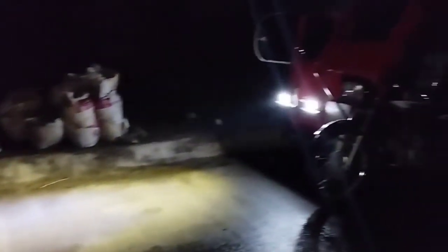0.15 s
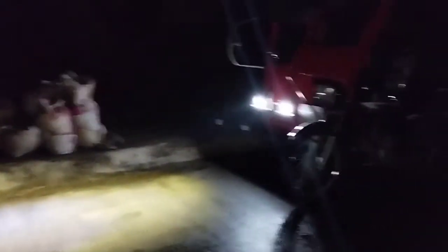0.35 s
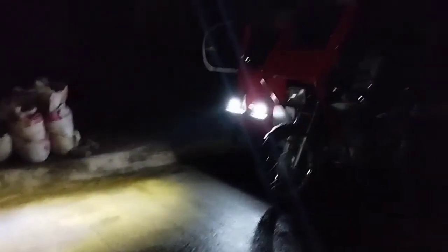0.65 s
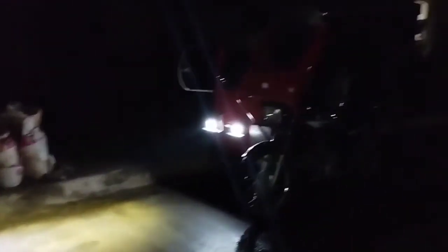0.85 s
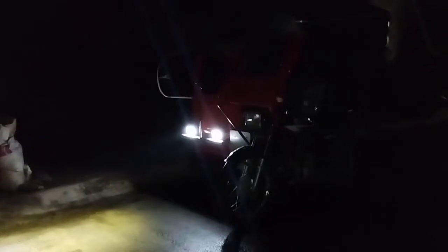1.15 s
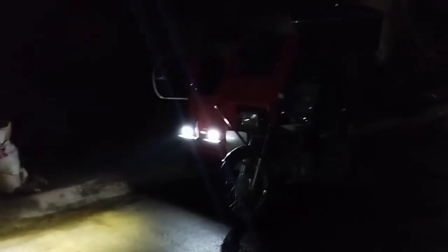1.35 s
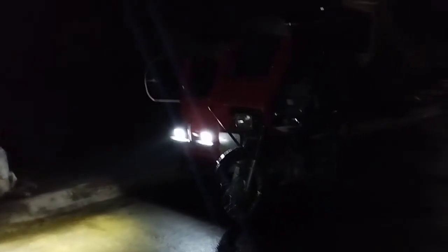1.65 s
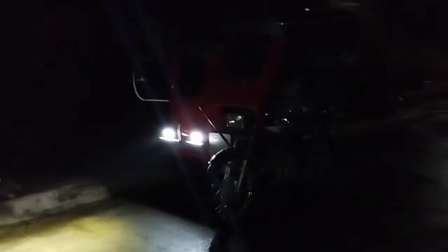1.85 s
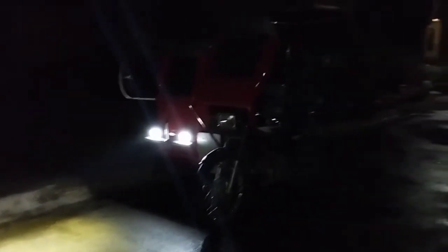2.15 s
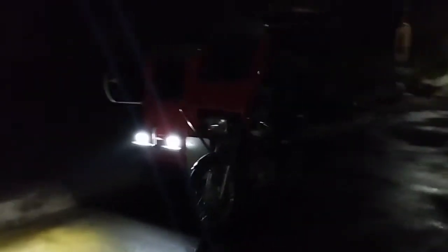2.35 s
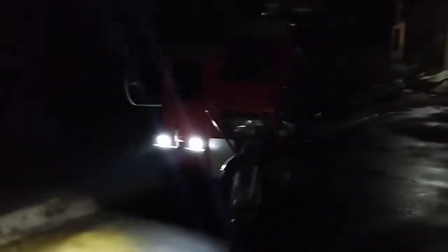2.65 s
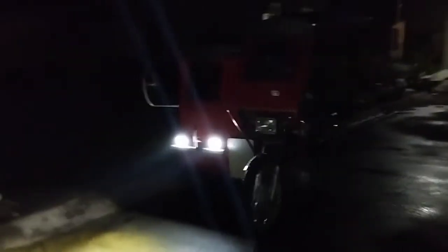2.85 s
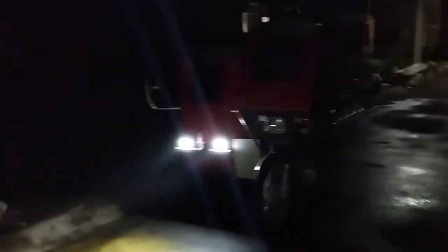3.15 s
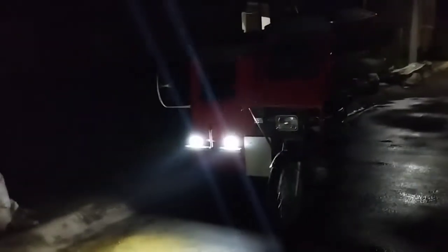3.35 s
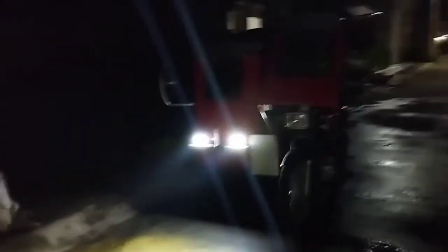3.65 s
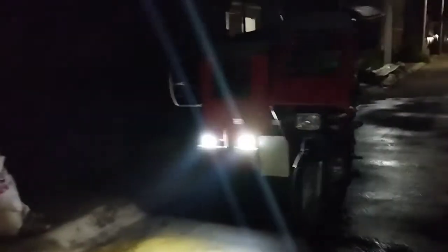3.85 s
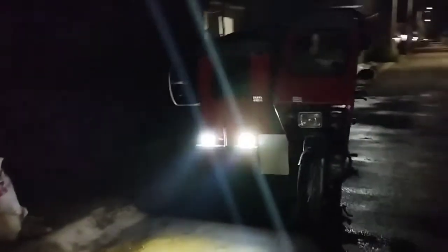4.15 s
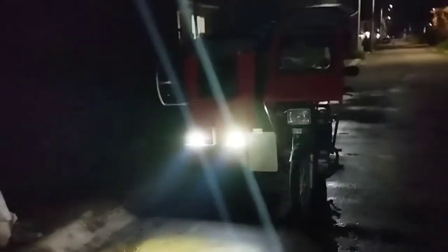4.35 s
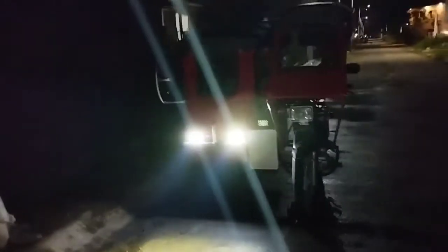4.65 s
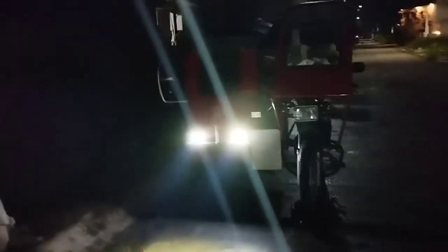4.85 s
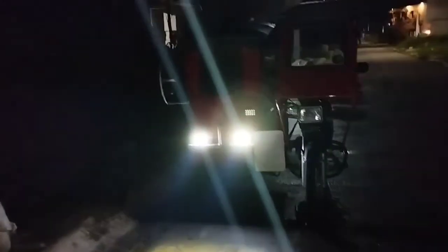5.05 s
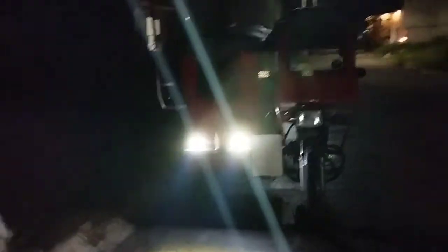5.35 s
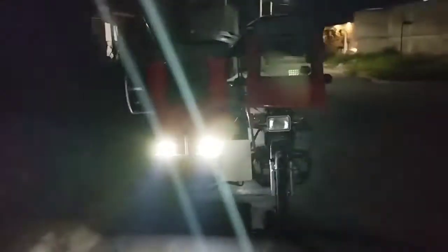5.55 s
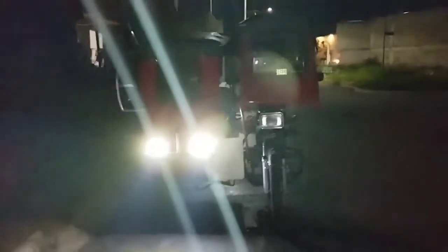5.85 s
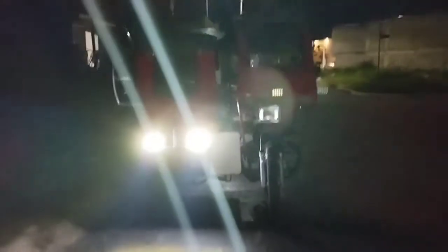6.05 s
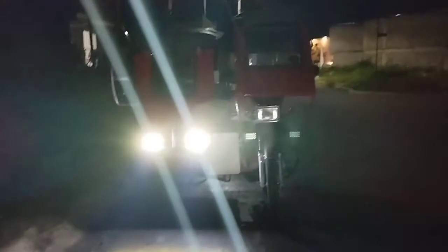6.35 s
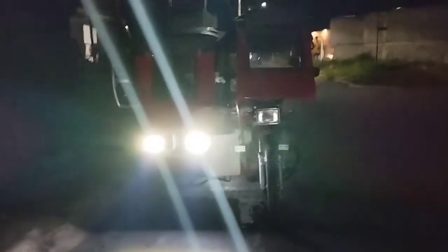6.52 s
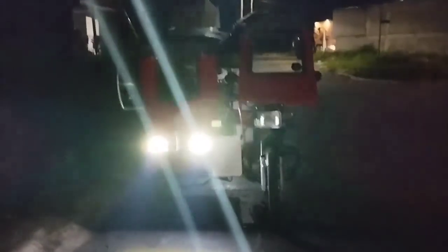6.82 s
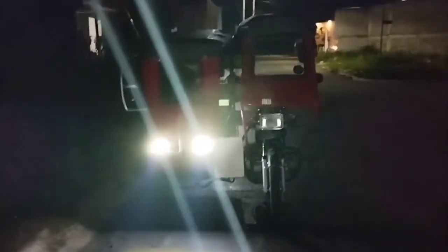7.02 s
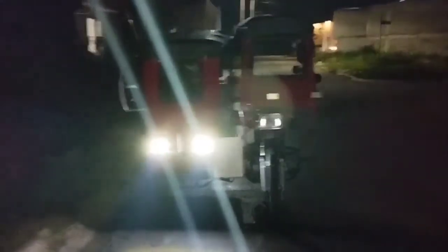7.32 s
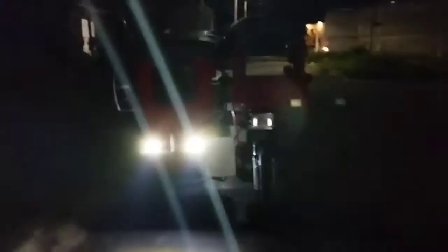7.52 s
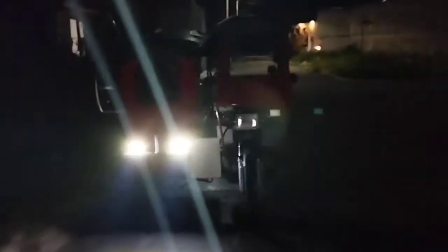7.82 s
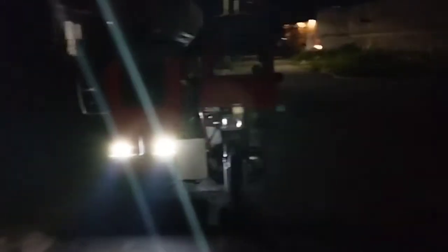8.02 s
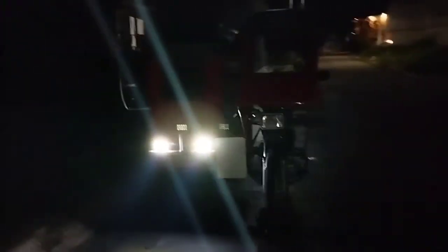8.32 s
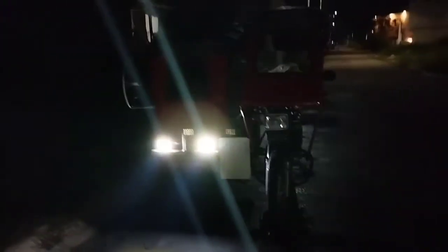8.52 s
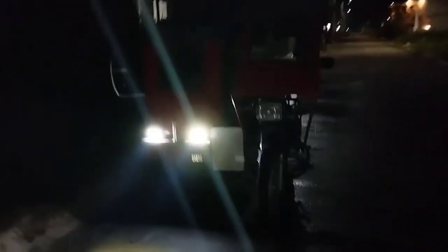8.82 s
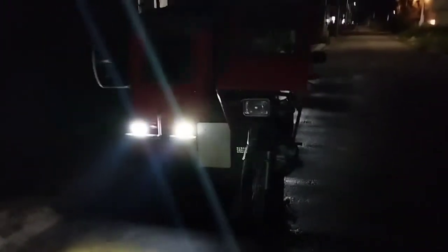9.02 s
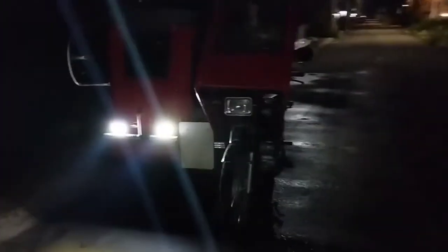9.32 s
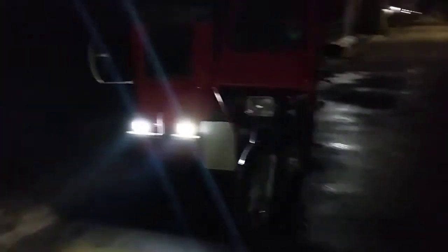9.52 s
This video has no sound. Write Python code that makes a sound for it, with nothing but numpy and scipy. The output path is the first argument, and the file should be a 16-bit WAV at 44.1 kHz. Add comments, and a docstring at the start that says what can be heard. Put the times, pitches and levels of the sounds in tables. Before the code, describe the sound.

A nearby tricycle engine putters steadily throughout, soft low thuds under rattling crankcase noise. Faint rubs, squeaks and hard little clicks occur close to the handheld microphone. Another small engine hums from afar, swelling and fading as its pitch climbs, then goes by a few metres away with hollow, pulsing exhaust blare. Low street rumble, slight reflections and a constant thin treble fizz surround it.

```python
"""A single-cylinder motor tricycle idles on a road at night: about nine firings a second ring its exhaust
and body, over shaped-noise clatter and valve ticks; a thin, pulsed noise sizzle sits high in the treble.
From far away a second engine drones up as four sine orders of its crank, gaining speed overall.
Filtered-noise scuffs, squeals and clicks sound close by.
The second engine then passes, its firing pulses ringing the silencer over bursts of exhaust gas."""
import sys
import numpy as np
from scipy import signal
from scipy.fft import rfft, irfft
from scipy.io import wavfile

SR = 44100
rng = np.random.default_rng(int(sys.argv[2]) if len(sys.argv) > 2 else 0)


def generate_wav(signal):
    """Clip the signal to [-1, 1] and save it as 16-bit WAV at the path in sys.argv[1]."""
    frames = np.transpose(np.atleast_2d(signal))
    scaled = np.clip(frames, -1, 1) * 32767
    pcm = np.round(scaled).astype(np.int16)
    wavfile.write(sys.argv[1], SR, pcm)


N = 426888
TIME = np.arange(N) / SR
FREQS = np.fft.rfftfreq(N, 1 / SR)
IDLE_HZ = 9.357  # mean firings per second


def amp(db):
    """Decibels to gain."""
    return 10 ** (np.asarray(db) / 20)


def evened(x):
    """Scales to rms 1."""
    return x / np.sqrt(np.mean(x ** 2) + 1e-20)


def read(points, hz):
    """A spectrum, joined by straight lines over log frequency."""
    f, value = np.transpose(points)
    return np.interp(np.log(hz + 1), np.log(f + 1), value)


def follow(rows):
    """A (time, value) curve at every sample."""
    s, value = np.transpose(rows)
    return np.interp(TIME, s, value)


def gain(rows):
    """A (time, dB) curve as gain at every sample."""
    return amp(follow(rows))


def colour(x, spectrum):
    """Filters by a spectrum, to rms 1."""
    return evened(irfft(rfft(x) * amp(read(spectrum, FREQS)), N))


def causal(x, spectrum):
    """Minimum-phase filter: each pulse starts sharply and rings afterwards, to rms 1."""
    cepstrum = irfft(np.log(amp(read(spectrum, FREQS))), N)
    cepstrum[1:] *= 2 * (np.arange(1, N) < N // 2)
    return evened(irfft(rfft(x) * np.exp(rfft(cepstrum)), N))


def place(x, balance):
    """Leans each frequency to the left or right by its L-R dB."""
    lean_db = read(balance, FREQS) / 2
    return irfft(rfft(x) * amp([lean_db, -lean_db]), N)


def air_noise():
    """White noise at two microphones, most alike in the bass."""
    # left-right likeness: pitch_hz, correlation
    likeness = [(60, 0.96), (130, 0.96), (290, 0.99), (640, 0.68), (1410, 0.27), (3100, -0.15),
                (6820, 0.074), (15000, -0.072)]
    a, b = rfft(rng.standard_normal((2, N)))
    same = np.clip(read(likeness, FREQS), -1, 1)
    mid = a * np.sqrt((1 + same) / 2)
    side = b * np.sqrt((1 - same) / 2)
    return irfft(np.array([mid + side, mid - side]), N)


def wander(hz):
    """Slow chance of rms 1, up to about hz."""
    return evened(irfft(rfft(rng.standard_normal(N)) * np.exp(-(FREQS / hz) ** 2), N))


def ring(x, modes):
    """Passes x through damped resonances (Hz, width Hz, dB), to rms 1."""
    response = 0
    for hz, width_hz, db in modes:
        damping = 1j * FREQS * width_hz
        response = response + amp(db) * damping / (hz ** 2 - FREQS ** 2 + damping)
    return evened(irfft(rfft(x) * response, N))


def street(x, wet_db, t60_s):
    """Direct sound plus scattered echoes from walls and road."""
    t = TIME[:SR // 2]
    tail = air_noise()[:, :len(t)] * amp(-60 * t / t60_s) * (t > .012)
    tail = tail / np.linalg.norm(tail[0])
    return x + amp(wet_db) * signal.fftconvolve(x[None], tail, axes=1)[:, :N]


def idle_turns():
    """Firings so far: a steady beat that hunts a little."""
    # firings come early or late: time_s, delay_s
    idle_lag = [(0, -.002), (.5, .002), (1.8, .002), (2.2, -.004), (2.9, .005), (3.4, .015), (3.9, .002),
                (4.3, -.002), (5.4, .005), (8.3, -.006), (9.68, 0)]
    first_firing_s = .080  # before hunting
    return IDLE_HZ * (TIME - first_firing_s - follow(idle_lag))


def idle_thumps(turns, uneven_db=1.3, puff_db=-56):
    """Each firing rings the exhaust, echoes off the sidecar and a wall, and trails a puff of gas."""
    # idling exhaust and sidecar body: pitch_hz, width_hz, relative_db
    thump_modes = [(44, 22, 1), (88, 26, 10.5), (143.5, 34, 6.5), (200, 36, 3), (324.3, 6, 5.5)]
    # thumps as the microphone moves: time_s, level_db
    thump_db = [(.8, -39.5), (2.2, -40.5), (3.3, -40.5), (4.3, -43.5), (5.5, -43), (9.68, -41.5)]
    at = np.flatnonzero(np.diff(np.floor(turns)))
    kicks = np.zeros(N)
    kicks[at] = amp(uneven_db * rng.standard_normal(len(at)))
    muffler = signal.butter(4, 235, fs=SR, output="sos")
    direct = signal.sosfilt(muffler, ring(kicks, thump_modes))
    blow = direct.copy()
    for delay_s, db in [(.0098, -4), (.033, -15)]:
        blow += amp(db) * np.interp(TIME - delay_s, TIME, direct)
    gas = air_noise() * np.exp(-(turns % 1) * np.pi)
    puff = signal.sosfilt(muffler, ring(gas, thump_modes))
    return gain(thump_db) * evened(blow) + amp(puff_db) * evened(puff)


def panel_hum(turns):
    """A loose body panel, one narrow mode kept ringing by noise that pulses with the firings."""
    # hum as the microphone moves: time_s, level_db
    panel_db = [(1.7, -56), (2.2, -66)]
    panel_mode = [(326, 6, 0)]
    return gain(panel_db) * ring(air_noise() * np.exp(-(turns % 1)), panel_mode)


def idle_knock(turns, decay_s=.013):
    """Each firing knocks in the crankcase: decaying noise through broad resonances."""
    # knock as the microphone moves: time_s, level_db
    knock_db = [(0, -74), (1.5, -66.5), (2.3, -58.5), (3.4, -58.5), (4.5, -63.5), (9.68, -65)]
    # what the knock rings: pitch_hz, width_hz, relative_db
    knock_modes = [(564, 120, -9.5), (730, 78, -6)]
    since_s = (turns - .04) % 1 / IDLE_HZ
    blow = air_noise() * np.exp(-since_s / decay_s)
    return gain(knock_db) * ring(ring(blow, knock_modes), [(704, 390, 0)])


def idle_clatter(turns, depth=0.94, tick_decay_cycles=0.01):
    """Piston and gears rattle the crankcase, least during the slow intake; the valves tick shut."""
    # clatter through one engine cycle, before depth: cycle_share after firing, relative_db
    clatter_cycle = [(.06, 2.5), (.25, -2), (.4, -.5), (.52, -3.5), (.63, -8), (.77, 2), (.86, -.5),
                     (.96, 1.5)]
    # clatter colour: pitch_hz, relative_db_per_hz
    clatter_colour = [(150, 13), (330, 5.5), (450, 4), (580, -13), (880, 8.5), (1050, 5), (1300, 2.5),
                      (1750, -5.5), (2600, -5.5), (4200, -7), (6200, -16), (7200, -28), (7900, -86),
                      (16000, -66)]
    # crankcase rings: pitch_hz, width_hz, relative_db
    case_modes = [(760, 27, -31), (974, 10, 5), (1021, 15, 11.5), (1110, 8.7, 12), (1260, 7.4, -25)]
    # clatter as the microphone moves: time_s, level_db
    clatter_db = [(.9, -47.5), (1.9, -50.5), (4.2, -52.5), (5, -51.5), (9.68, -48.5)]
    # rings against the clatter as the microphone moves: time_s, relative_db
    case_db = [(0, -11), (2.2, -13.5), (4.2, -11.5), (5.2, -8), (9.68, -11)]
    # valve ticks as the microphone moves: time_s, level_db
    tappet_db = [(0, -64), (.5, -60), (2, -61), (3.9, -56.5), (6.4, -58.5), (8.3, -56.5), (9.68, -57)]
    # stereo lean: pitch_hz, left_minus_right_db
    clatter_pan = [(300, 4.5), (480, -21), (660, 17), (900, -1.5), (1200, -4.5), (2000, -7.5), (4000, -4),
                   (7000, -2.5)]
    share, cycle_db = np.transpose(clatter_cycle)
    stroke_db = depth * np.interp(turns % 1, share, cycle_db, period=1)
    knocks = air_noise() * amp(stroke_db + .5 * wander(hz=255))
    rings = gain(case_db) * ring(knocks, case_modes)
    case = gain(clatter_db) * (colour(knocks, clatter_colour) + rings)
    seats = sum(np.exp(-((turns - seat) % 1) / tick_decay_cycles) for seat in (.09, .5, .82))
    ticks = air_noise() * (0.9 + seats * amp(5.8 * wander(hz=23)))
    tick_colour = [(900, -8.0), (2000, 4.0), (4300, -3.5), (6300, -10.5), (7300, -0.5), (8000, -64.0)]
    ticks = colour(ticks, tick_colour)
    return place(case + gain(tappet_db) * ticks, clatter_pan)


def rumble():
    """Noise for both engines scattered along the street, with a little air moving over each microphone."""
    # street rumble colour: pitch_hz, relative_db_per_hz
    rumble_colour = [(15, -21), (28, -7.5), (50, 4), (75, 1), (130, 3), (210, -9.5), (300, -14),
                     (500, -24.5), (1500, -105)]
    # street rumble, before wander: time_s, level_db
    rumble_db = [(0, -41.5), (2.8, -42.5), (3.8, -38.5), (5.2, -39.5), (7, -39), (9.68, -38)]
    # engine noise returned by the walls: pitch_hz, relative_db_per_hz
    far_hum = [(150, -2), (270, 13), (325, 4.5), (420, -1.5), (600, 0), (760, -0.5), (1100, -6),
               (1600, -11.5), (4000, -41), (8000, -83)]
    # wall return, swelling with the pass: time_s, level_db
    hum_db = [(0, -52), (2.5, -54.5), (5, -50), (5.9, -47.5), (6.7, -44), (8.2, -45.5), (9.68, -47.5)]
    wash = colour(air_noise(), rumble_colour) * amp(follow(rumble_db) + 1.0 * wander(hz=1.6))
    hum = colour(air_noise(), far_hum) * gain(hum_db)
    breeze_colour = [(12, 11), (28, 22), (60, 12), (150, -5), (600, -107)]
    breeze = colour(rng.standard_normal((2, N)), breeze_colour)
    return wash + hum + breeze * amp(-47.5 + 1.4 * wander(hz=2.4))


def sizzle(pulse_hz=233, buzz_db=-13, depth=0.13):
    """A thin electrical fizz: treble noise and sparks pulsing about pulse_hz times a second."""
    # fizz colour: pitch_hz, relative_db_per_hz
    sizzle_colour = [(8000, -77), (8800, -28), (9700, -15.5), (10500, -17.5), (11200, -21), (12000, -8),
                     (13200, 3), (14200, 5.5), (15500, 4)]
    # stereo lean: pitch_hz, left_minus_right_db
    sizzle_pan = [(9000, 9), (11200, 16), (12500, 5), (14000, 10.5), (15500, -9)]
    # lower skirt as the microphone turns: time_s, gain_db
    sizzle_tilt = [(0, 5.5), (1.8, 2.5), (3.2, 6.5), (4.6, 0.5), (9.68, -1)]
    start_db, growth_db_per_s = -47.5, 0.22
    turns = np.cumsum(pulse_hz * (1 + .002 * wander(hz=1.5))) / SR
    sparks = evened(np.sinc((turns % 1 - .5) * SR / pulse_hz))
    fizz = evened(air_noise() * (1 - depth * np.cos(2 * np.pi * turns)))
    # each burst partly repeats the one before
    fizz = evened(fizz + .25 * np.roll(fizz, round(SR / pulse_hz), axis=1))
    sound = place(colour(fizz + amp(buzz_db) * sparks, sizzle_colour), sizzle_pan)
    lower = irfft(rfft(sound) * read([(10800, 1), (12200, 0)], FREQS), N)
    tilted = sound + lower * (gain(sizzle_tilt) - 1)
    return tilted * amp(start_db + growth_db_per_s * TIME)


def squeals():
    """A light rub excites one narrow resonance, swelling and fading."""
    # faint rubbing squeals: start_s, length_s, pitch_hz, level_db at the crest, width_hz
    squeal_rows = [(0, 0.82, 2530, -59, 260), (2.15, 1.5, 1320, -62, 45), (9.1, 0.5, 2000, -57.5, 70),
                   (9.1, 0.44, 2230, -71, 110)]
    out = np.zeros((2, N))
    for s, length_s, hz, db, width_hz in squeal_rows:
        swell = np.sin(np.pi * np.clip((TIME - s) / length_s, 0, 1))
        b, a = signal.iirpeak(hz, hz / width_hz, fs=SR)
        tone = evened(signal.lfilter(b, a, rng.standard_normal((2, N))))
        out += amp(db) * np.sqrt(abs(swell)) * tone
    return out


def passing_engine(rasp_db=-45):
    """Four low exhaust orders carry far; near by, firings also ring the silencer and gas rasps."""
    # passing crank: time_s, speed_turns_per_s
    crank_speed = [(0, 45.6), (.72, 44.1), (1.45, 46.9), (1.87, 47.2), (2.7, 49.8), (3.39, 50.7),
                   (3.68, 52.1), (4.59, 53.3), (6.1, 53.3), (6.4, 53.9), (6.86, 56.1), (7.18, 58),
                   (7.55, 58.1), (7.85, 59.3), (8.4, 60.1), (8.74, 60.3), (9.01, 61.5), (9.68, 62.9)]
    # once-a-turn exhaust tone: time_s, level_db
    first_db = [(0.0, -46), (3.6, -51), (3.88, -41), (5.16, -40), (5.48, -31), (6.24, -36), (7.2, -21),
                (8.68, -28.5), (9.64, -21.5)]
    # its octave, swelled and cancelled by road and walls: time_s, level_db
    second_db = [(0.0, -59), (0.72, -50.5), (1.05, -36.5), (1.72, -26.5), (1.96, -31.5), (2.16, -26),
                 (2.56, -41.5), (2.8, -29), (3.48, -33), (3.68, -47), (3.92, -29), (4.32, -28), (4.64, -42),
                 (4.88, -33.5), (5.72, -37), (6.44, -27), (8.2, -36), (8.44, -53)]
    # third exhaust order, loudest just after the pass: time_s, level_db
    third_db = [(5.8, -88), (6.55, -36), (6.92, -32), (7.2, -43.5), (7.85, -39.5), (8.4, -58), (9.68, -44)]
    # fourth exhaust order: time_s, level_db
    fourth_db = [(5.8, -67), (6.6, -52), (7.2, -41), (8, -44), (8.6, -69)]
    # silencer ring through the pass: time_s, level_db
    ring_db = [(5.7, -69), (6.1, -51), (6.35, -44.5), (6.7, -37.5), (7.15, -35), (7.6, -36), (8.3, -34.5),
               (9, -36), (9.68, -46)]
    # silencer ring while still far: time_s, level_db
    far_ring_db = [(0, -115), (3.2, -63), (3.8, -56.5), (4.25, -53), (4.7, -58.5), (5.7, -89)]
    speed = follow(crank_speed)
    angle = 2 * np.pi * np.cumsum(speed) / SR
    drone = np.zeros(N)
    for order, rows in enumerate((first_db, second_db, third_db, fourth_db), 1):
        drone -= gain(rows) * np.sin(order * angle)
    pulses = silencer(speed, angle)
    close = evened(street(pulses, wet_db=-9, t60_s=.1))
    # from far away only the silencer's main resonance arrives, scattered by the street
    main_mode = [(555, 110, 0)]
    far = ring(ring(pulses + 12 * air_noise(), main_mode), main_mode)
    tone = close * gain(ring_db) + far * gain(far_ring_db)
    gas = rasp(speed, angle) * amp(rasp_db) * pass_gain(rear_db=5.5)
    pan = [(200, -2.0), (550, -0.5), (1000, -5.5), (2000, -17.5)]  # Hz, L-R dB
    return np.sqrt(2) * drone + place(tone + gas + intake(angle), pan)


def beats(speed, angle):
    """Seconds since the last firing, and since the last off-beat one turn apart from it."""
    firing_turn = .8  # place in the two-turn cycle
    return [(angle / (2 * np.pi) - firing_turn - k) % 2 / speed for k in (0, 1)]


def silencer(speed, angle, airbox_db=-11):
    """One sharp pulse every second turn rings the silencer; a beat between rings it and thuds in the air box."""
    # exhaust colour above the drone: pitch_hz, relative_db
    silencer_colour = [(130, -22.5), (235, -13.5), (290, -10), (335, -14.5), (375, -17.5), (405, 1.5),
                       (445, -3.5), (472, -14), (500, 12), (518, 12), (548, 0), (580, 4), (630, 4.5),
                       (665, -16.5), (705, -5), (750, -7.5), (820, -15), (1000, -12.5), (1300, -41),
                       (1650, -37), (2500, -32.5)]
    # off-beat against the firing, heard mostly from the front: time_s, relative_db
    offbeat_db = [(6.3, 0.5), (6.8, -6.5), (7.6, -5.5), (8.3, -9), (9.1, -14.5)]
    pulse_s, uneven_db, shake_turns = .00015, 1.0, .005  # 1/e half-width, rms, rms
    shaken = angle + 2 * np.pi * shake_turns * wander(hz=8)
    fire, offbeat = (np.exp(-(since_s / pulse_s - 3) ** 2) * amp(uneven_db * wander(hz=25))
                     for since_s in beats(speed, shaken))
    airbox = [(361, 160, 0)]
    thud = ring(ring(offbeat, airbox), airbox)
    return causal(fire + gain(offbeat_db) * offbeat, silencer_colour) + amp(airbox_db) * thud


def rasp(speed, angle, offbeat_db=-2, gush_s=.006, steady=.35):
    """Gas bursts out with every beat and decays towards a steady flow."""
    # exhaust gas colour: pitch_hz, relative_db
    rasp_colour = [(60, 5.5), (150, 13.5), (300, -1), (440, 10), (580, 22.5), (700, 4), (1000, 11),
                   (1300, -8.5), (1650, -23), (2200, -19.5), (4000, -28), (8000, -52)]
    fire, offbeat = (np.exp(-since_s / gush_s) for since_s in beats(speed, angle))
    return causal(air_noise() * (steady + fire + amp(offbeat_db) * offbeat), rasp_colour)


def intake(angle, level_db=-56, gate=0.11):
    """Airy roar beamed from the front of the passing engine, pulsing once a turn."""
    roar_colour = [(700, -33), (1100, -5.5), (1650, 3), (2300, -10.5), (3200, -38), (6000, -53.5)]
    roar = colour(air_noise() * (1 + gate * np.cos(angle)), roar_colour)
    return roar * amp(level_db) * pass_gain(rear_db=-5.5)


def pass_gain(rear_db):
    """Spreading, screening and beaming: rear_db favours the back over the front."""
    # screening by the parked tricycle on the way in, the roadside on the way out: time_s, gain_db
    screen_db = [(5.5, -21), (6.2, -8.5), (6.7, 2.5), (8.85, 2), (9.68, -11)]
    abreast_s, distance_m, road_m_per_s = 6.23, 4.8, 4.3
    along_m = road_m_per_s * (TIME - abreast_s)
    range_m = np.hypot(along_m, distance_m)
    behind = along_m / range_m  # -1 facing the microphone, 1 pointing away
    return distance_m / range_m * amp(rear_db * behind + follow(screen_db))


def scuffs(grain_db=3.0, width=0.66, pan_db=-1):
    """Short grainy rubs close to the microphone: band noise that swells and fades."""
    # rubs before dulling and pan: start_s, level_db, length_s, centre_hz
    scuff_rows = [(0.554, -51.5, 0.035, 3300), (0.607, -54, 0.088, 4180), (1.775, -56, 0.03, 4970),
                  (2.415, -47.5, 0.027, 3640), (2.457, -55, 0.025, 2000), (2.492, -54, 0.1, 4530),
                  (3.008, -52.5, 0.084, 4470), (3.092, -56, 0.06, 2220), (3.705, -48.5, 0.032, 3600),
                  (3.743, -52.5, 0.096, 2920), (3.827, -61.5, 0.44, 2000), (4.268, -54, 0.12, 3600),
                  (4.33, -60, 0.071, 2498), (4.866, -56.5, 0.12, 3020), (5.475, -50.5, 0.057, 3160),
                  (5.641, -45, 0.059, 5570), (5.85, -46, 0.031, 5300), (8.09, -53, 0.057, 5000),
                  (9.137, -53, 0.025, 1940), (9.56, -50, 0.028, 5000), (9.587, -54, 0.043, 3530)]
    grains = air_noise() * evened(amp(grain_db * wander(hz=400)))
    out = np.zeros((2, N))
    for s, db, length_s, hz in scuff_rows:
        span = slice(int(s * SR), int(s * SR) + SR // 4)
        u = (TIME[span] - TIME[span][0]) / length_s * 3
        b, a = signal.iirpeak(hz, 1 / width, fs=SR)
        crisp = 0.002 / (length_s + 0.0022)  # the shorter the contact, the broader its spectrum
        rub = evened(signal.lfilter(b, a, grains[:, span])) + crisp * grains[:, span]
        out[:, span] += amp(db) * evened(rub) * u * np.exp(1 - u)
    dulling = [(700, -24), (1800, 7.5), (7000, -4.0), (8200, -17), (12000, 0.0), (16000, -3)]
    return irfft(rfft(out) * amp(read(dulling, FREQS)), N) * amp([[pan_db], [-pan_db]])


def clicks(crack_db=-17, pan_db=-1, crack_s=.0008, s_per_q=.0004):
    """Hard little contacts near the microphone: a broad crack and a ring that dies at once."""
    # clicks before pan: start_s, level_db, ring_hz, decay_s
    click_rows = [(.577, -39, 2930, .002), (1.035, -40, 4250, .006), (2.428, -44, 2100, 0.0028),
                  (2.482, -35, 2250, 0.0017), (2.541, -47, 2930, 0.0018), (3.024, -38, 3370, 0.0029),
                  (3.097, -40, 1820, 0.0017), (3.179, -41, 4080, 0.0022), (3.249, -42.5, 3370, 0.0028),
                  (3.712, -45, 4130, .003), (3.774, -47, 3450, .002), (3.795, -43, 2570, 0.0025),
                  (4.298, -43, 2580, .002), (4.342, -44, 2070, 0.0024), (4.896, -42, 2930, 0.0018),
                  (5.465, -39.5, 3270, 0.0045), (5.505, -50, 4020, .005), (5.66, -42, 6450, 0.0055),
                  (5.668, -40.5, 2800, 0.0057), (5.681, -38, 6370, .003), (5.863, -45, 4650, .003),
                  (6.032, -48, 5860, 0.0024), (8.198, -34, 14300, 0.0024), (8.202, -28, 2160, 0.0018),
                  (8.202, -33.5, 3700, 0.0026), (8.904, -46, 4300, 0.0033), (8.933, -37, 2650, 0.0047)]
    t = TIME[:SR // 40]
    out = np.zeros((2, N))
    for s, db, hz, decay_s in click_rows:
        noise = rng.standard_normal((2, len(t)))
        # longer clicks ring more purely
        b, a = signal.iirpeak(hz, max(decay_s / s_per_q, 2), fs=SR)
        body = evened(signal.lfilter(b, a, noise))
        click = body * np.exp(-t / decay_s) + amp(crack_db) * noise * np.exp(-t / crack_s)
        out[:, int(s * SR):][:, :len(t)] += amp(db) * click
    return out * amp([[pan_db], [-pan_db]])


def scene():
    """Both engines and the small sounds around them."""
    turns = idle_turns()
    idle = idle_thumps(turns) + panel_hum(turns) + idle_knock(turns) + idle_clatter(turns)
    return idle + rumble() + sizzle() + squeals() + passing_engine() + scuffs() + clicks()


def record(dry, edge_hz=15560):
    """Band limit: a steep linear-phase low-pass at edge_hz."""
    lowpass = signal.firwin(1023, edge_hz, window=("kaiser", 9), fs=SR)
    return signal.oaconvolve(dry, lowpass[None], "same", axes=1)


dry = scene()
out = record(dry)
generate_wav(out)
```